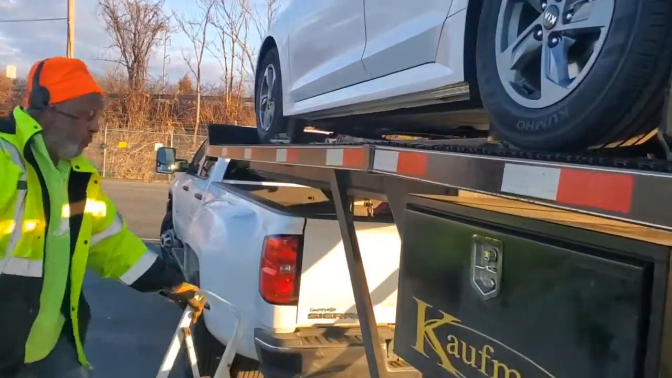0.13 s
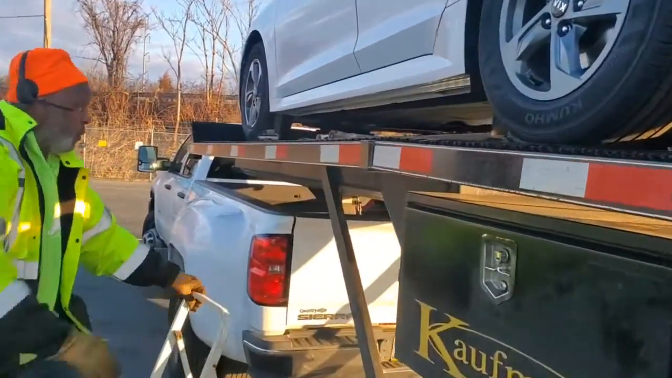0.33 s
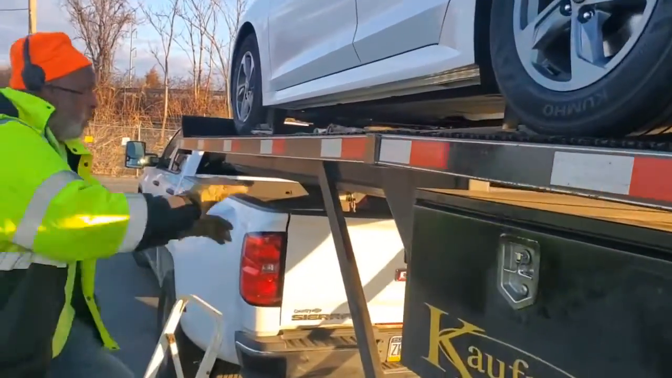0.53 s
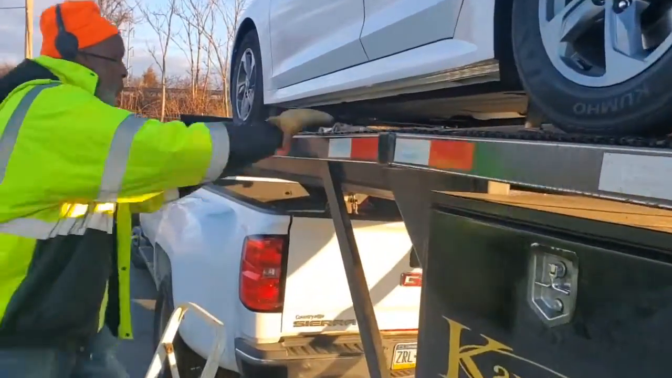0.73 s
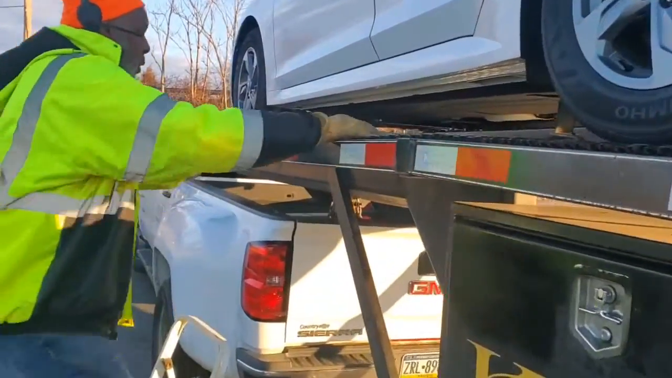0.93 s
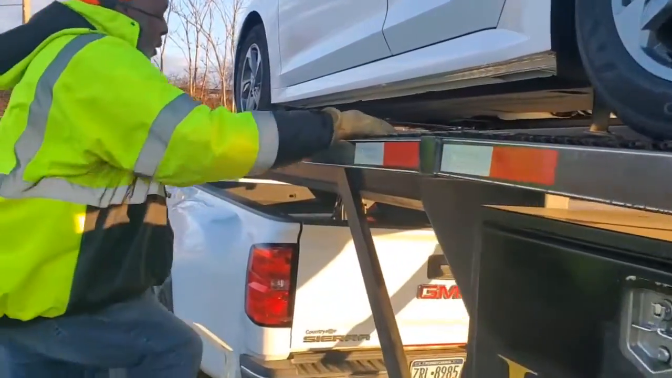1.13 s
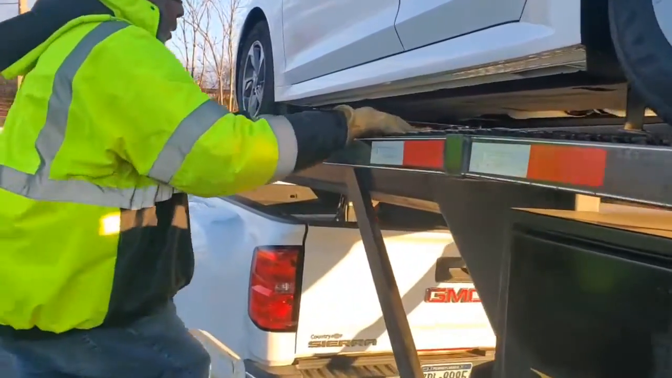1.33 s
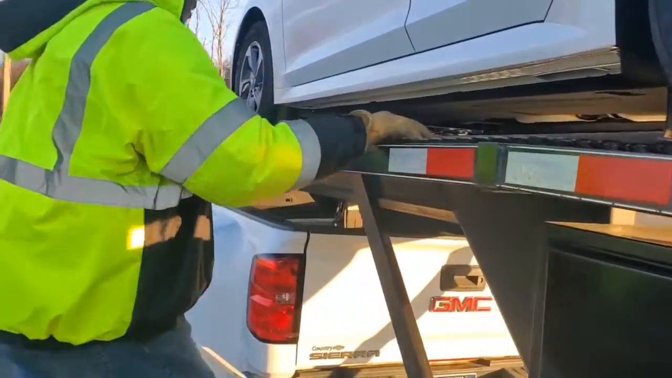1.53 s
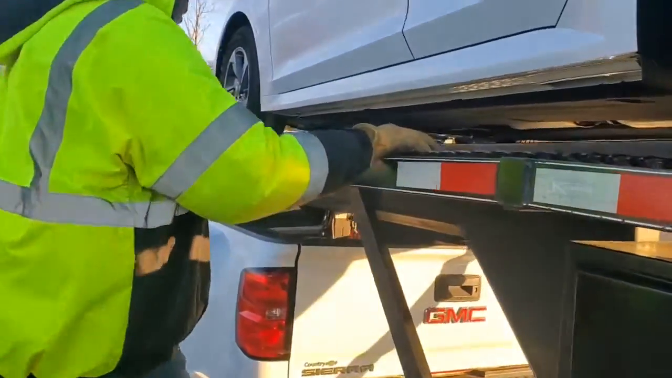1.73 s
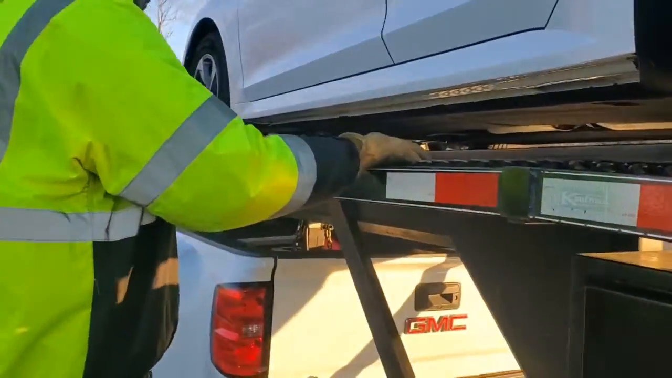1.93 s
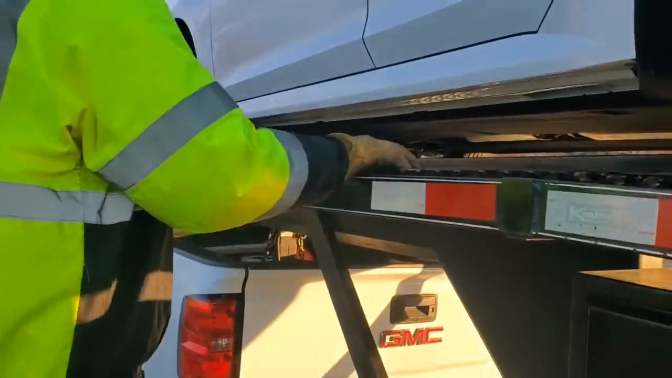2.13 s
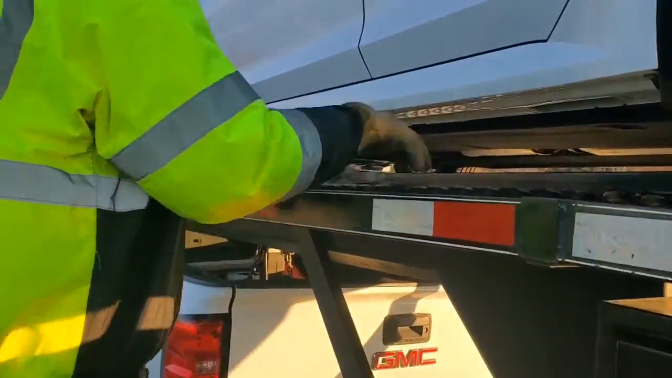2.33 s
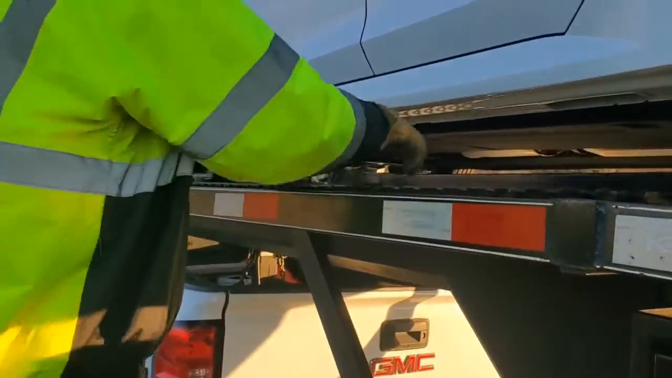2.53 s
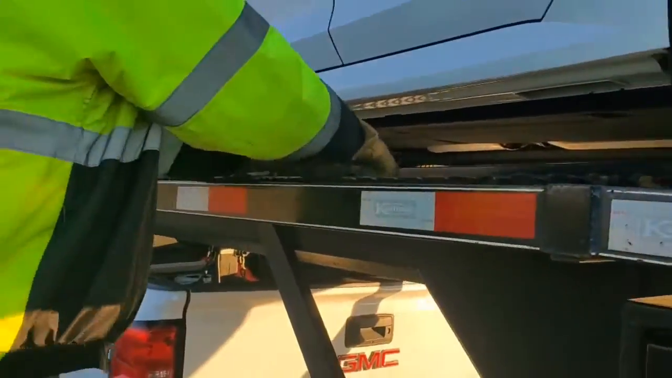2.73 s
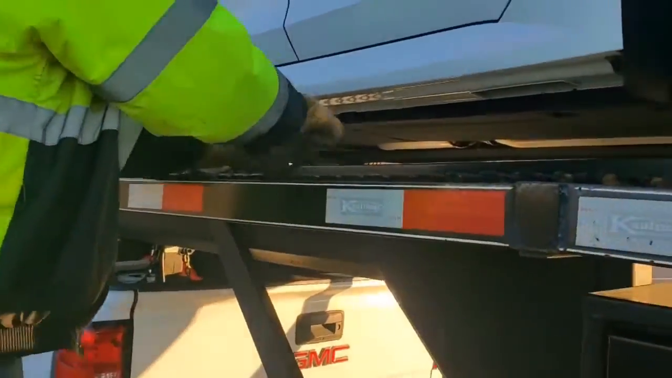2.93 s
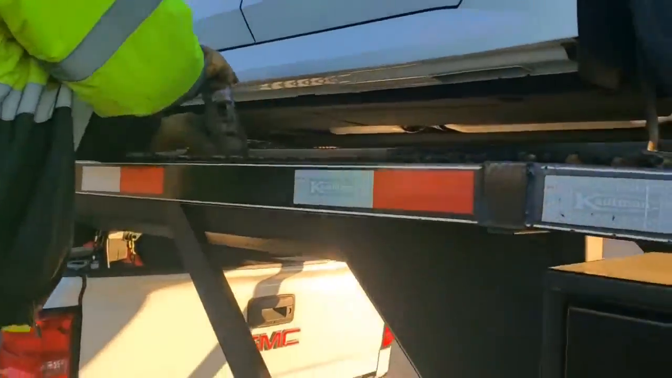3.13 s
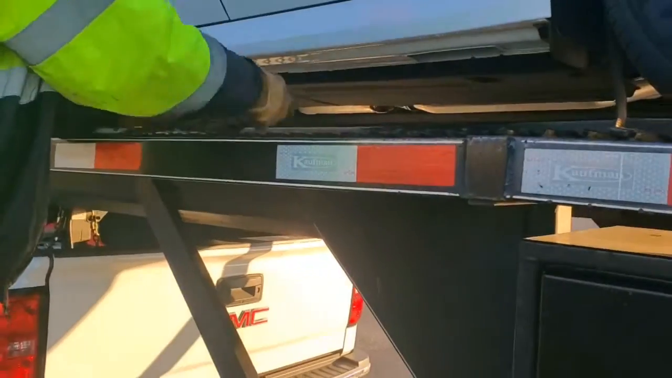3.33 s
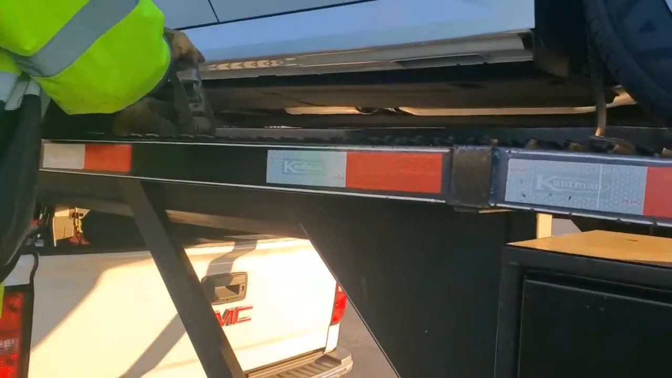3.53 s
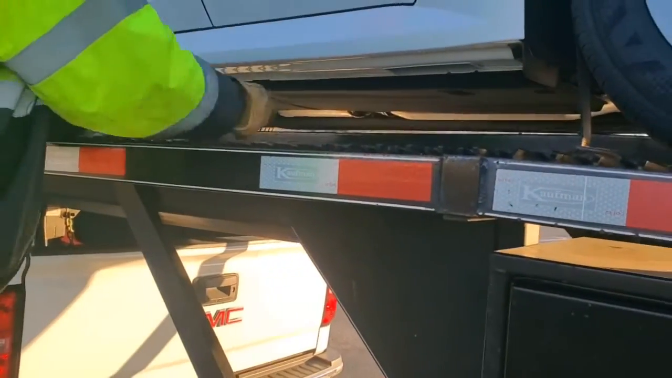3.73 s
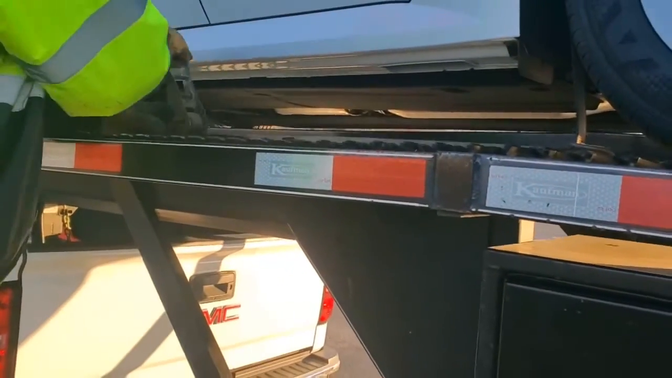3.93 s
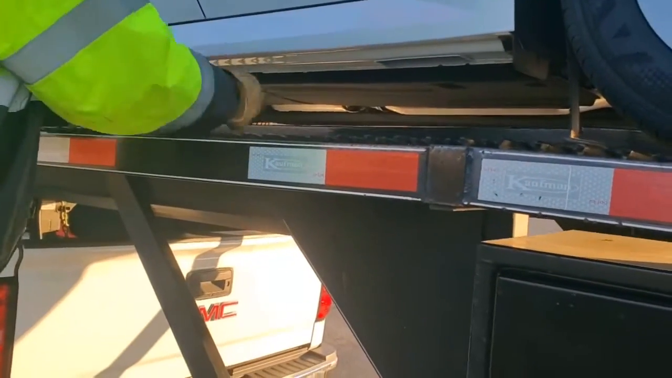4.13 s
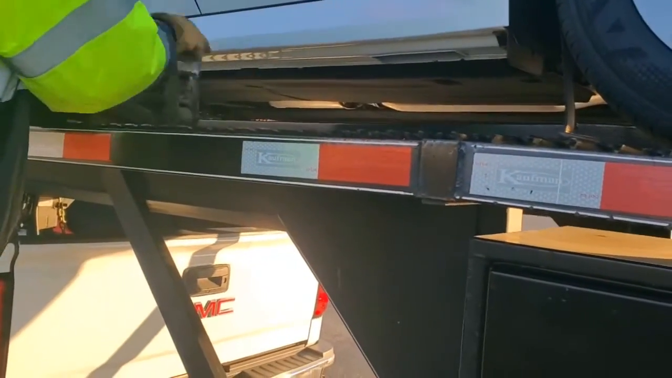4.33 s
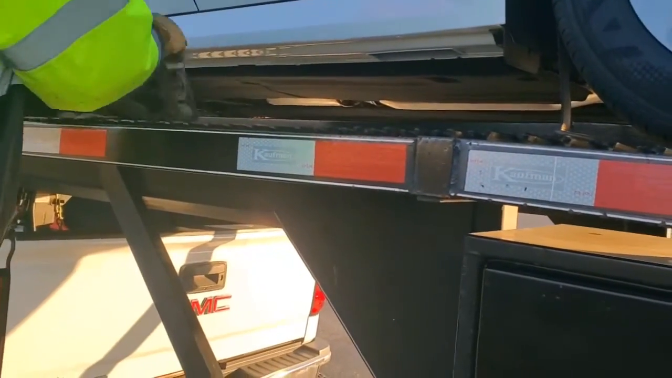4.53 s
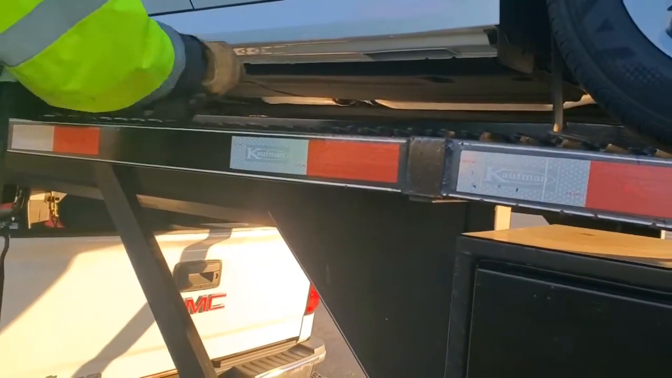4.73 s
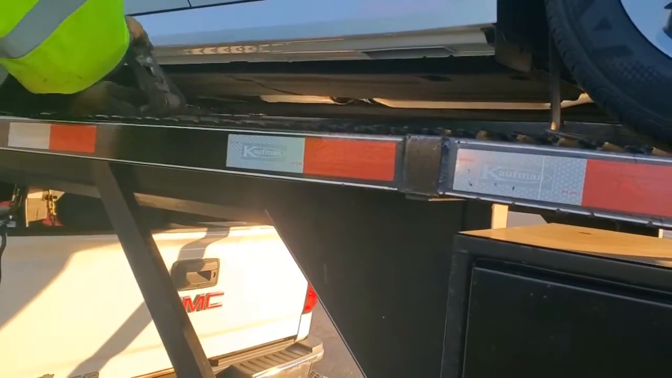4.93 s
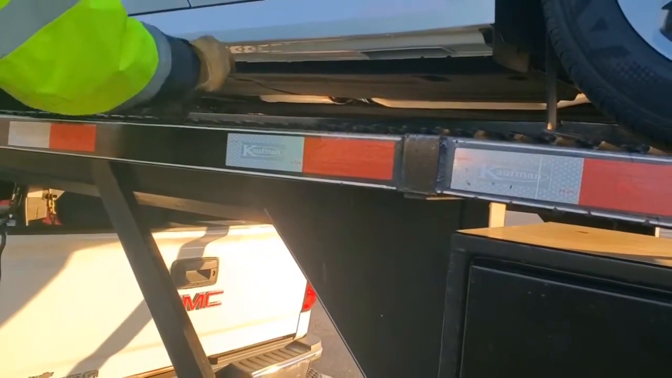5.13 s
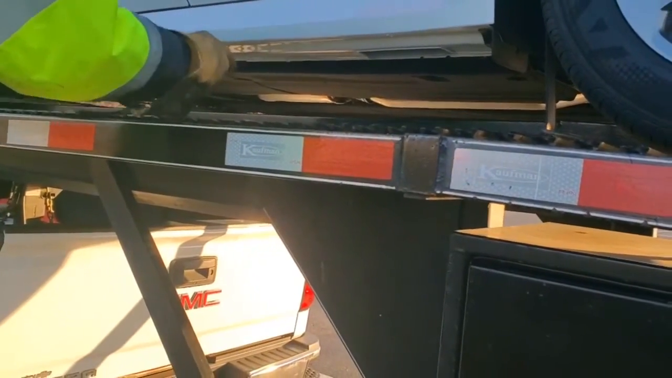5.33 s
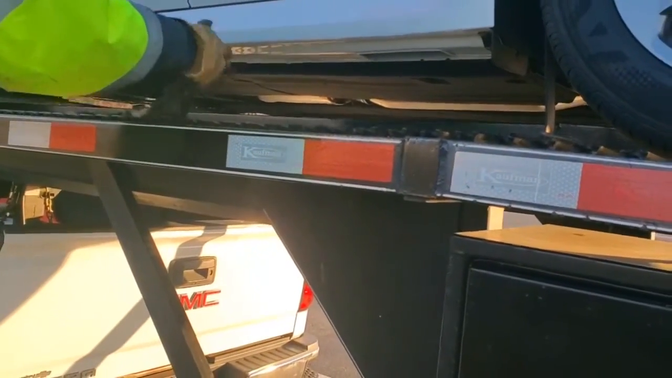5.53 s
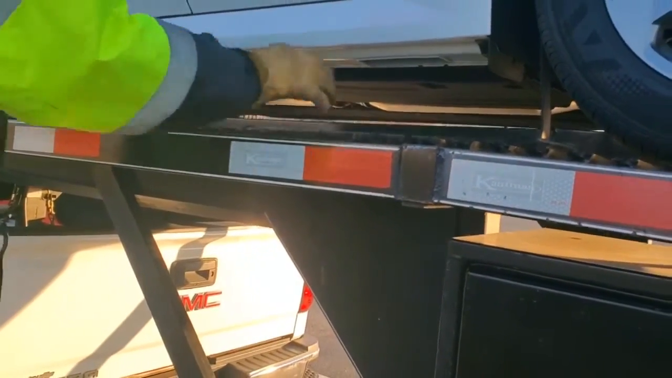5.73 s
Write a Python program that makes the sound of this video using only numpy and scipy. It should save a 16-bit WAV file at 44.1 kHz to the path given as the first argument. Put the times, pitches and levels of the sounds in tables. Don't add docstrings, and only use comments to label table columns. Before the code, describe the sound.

Outdoors in gusty wind, ladder feet grate briefly, a gloved hand fumbles on metal, and a ratchet handle clicks, bangs and rattles hard.

```python
import sys
import numpy as np
from scipy import signal
from scipy.fft import rfft, irfft, next_fast_len
from scipy.io import wavfile
from scipy.ndimage import uniform_filter1d, map_coordinates

SR = 44100
rng = np.random.default_rng(int(sys.argv[2]) if len(sys.argv) > 2 else 0)


def materialize(psi):
    bounded = np.clip(np.atleast_2d(psi).T, -1, 1)
    quanta = np.round(bounded * 32767).astype(np.int16)
    wavfile.write(sys.argv[1], SR, quanta)


def how_loud(loudness_db):
    steps = np.asarray(loudness_db, float) / 20
    return 10 ** steps


N = 254456

# (time [s], strength [dB])
BREEZE = [(0, -44), (.6, -41), (1.0, -39.5), (1.16, -43), (1.3, -41.5), (1.6, -34.5), (2.0, -34.5),
          (2.6, -37), (3.0, -34.5), (3.5, -34), (3.7, -42), (4.05, -34), (4.35, -38.5), (4.47, -42),
          (4.68, -34), (5.08, -39.5), (5.45, -36.5), (5.77, -39.5)]
# (time [s], peak [dB], left minus right [dB])
EDDIES = [(0.349, -31.5, 2), (0.489, -32, -2), (0.769, -32, -2), (1.033, -48, -11), (1.094, -29, -4),
          (1.458, -31, 3), (1.674, -23.5, 5), (1.791, -31.5, 17), (2.044, -21.5, 3), (2.243, -24.5, -1),
          (2.39, -30, 8), (2.466, -29.5, -6), (2.582, -33, 5), (2.706, -20, -2), (2.771, -27, 10),
          (2.977, -23, -2.5), (3.032, -24, 3), (3.214, -22, 2), (3.345, -21.5, 3), (3.48, -22, 0),
          (3.634, -28.5, -5), (3.78, -24.5, -1), (3.97, -22.5, -1), (4.362, -29.5, 3), (4.548, -23.5, 1),
          (4.6, -23, -2), (4.811, -30, 14), (5.014, -20, 3), (5.139, -32, -7), (5.343, -25, -6.5)]
# (time [s], peak [dB], half length [s])
RUSTLES = [(1.056, -63, 0.13), (.6, -68.5, 0.17), (1.45, -69.5, 0.42), (2.197, -59.5, 0.34),
           (2.8, -63, 0.22), (2.476, -56.5, 0.23), (3.09, -50, 0.084), (3.36, -58, .07), (3.8, -60, 0.33),
           (4.2, -62, 0.18), (4.62, -66, .12), (4.898, -49, 0.049), (5.705, -65.5, 0.37)]
# (frequency [Hz], density [dB/Hz])
BUFFET_SPECTRUM = [(12, -47), (20, -2), (32, -46), (50, -1.5), (75, -1), (99, -1), (129, -15), (162, -11.5),
                   (260, -28), (340, -27), (570, -120)]
# (frequency [Hz], density [dB/Hz])
RUSH_SPECTRUM = [(88, -9.5), (150, 5), (240, 0.5), (414, -4.5), (662, -7), (1060, -12.5), (3290, -26.5),
                 (6640, -32.5), (7770, -36), (15100, -36), (16000, -37)]

# (time [s], level [dB], brightness [dB])
DRAG = [
    (0.0, -14, -6),
    (.1, -21, -12),
    (.138, -16, -9.5),
    (.292, -23.5, -15.5),
    (.32, -22.5, -3),
    (.398, -51, -25),
    (.43, -33, -9.5),
    (.482, -33, -12),
    (.53, -63, -8),
]
# (time [s], frequency [Hz], level [dB], t60 [s])
PINGS = [(.006, 1684, -11.5, 0.1), (0.126, 1730, -17, 0.075), (.115, 4200, -13, 0.42),
         (.19, 1707, -18, 0.48), (.266, 2760, -19.5, 0.2), (.293, 1780, -24, .04),
         (0.427, 2160, -16.5, 0.068), (1.355, 1600, -46, 0.055), (.018, 1950, -19, .1),
         (.022, 1230, -17, .1), (.07, 2170, -25, .2), (.122, 2180, -13.5, .1), (.12, 2760, -16, .1),
         (.145, 2900, -18, .1), (.162, 1880, -19, .1), (.175, 840, -22, 0.073), (.225, 1740, -23, 0.4),
         (.22, 2820, -17, .2), (2.255, 3690, -40, 0.18), (2.901, 1436, -28, 0.12),
         (3.72, 1950, -12.5, 0.052), (4.13, 600, -33, 0.079)]
# (time [s], frequency [Hz], level [dB], t60 [s], glide [Hz/s])
SQUEAKS = [
    (.77, 2365, -47.5, 0.61, -700),
    (.865, 2230, -48.5, 0.62, 399),
    (0.92, 2780, -56, .8, 901),
    (.9, 2900, -52, 0.84, 900),
    (.99, 2950, -52, 0.43, 1200),
    (.995, 2330, -51, 1.1, -700),
    (1.215, 1760, -42, .1, 3000),
    (1.232, 2150, -36, .1, 2999),
    (1.236, 3250, -37, .08, 3000),
]
# (frequency [Hz], width [Hz], level [dB])
LADDER_MODES = [(750, 43, -17.5), (1675, 37, 7), (1950, 114, 7), (2350, 15, -2.5), (2400, 32, -31),
                (2760, 85, -4), (2900, 23, -46), (3140, 27, 3), (4380, 28, -0.5), (5840, 88, -14),
                (8480, 240, -7)]
# (frequency [Hz], density [dB/Hz])
LADDER_SPECTRUM = [(170, -14), (300, -12.5), (737, -1.5), (1390, -3.5), (1660, -7), (2070, -6), (2840, 4),
                   (7440, -4.5), (11500, -4), (16000, -17.5)]

# (time [s], peak [dB], brightness [dB/octave], t60 [s])
TOUCHES = [(.415, -30, 2.5, 0.35), (.535, -38, -0.5, 0.32), (1.224, -33, 0.5, 0.14), (1.242, -45, 7.5, 0.2),
           (1.355, -36.5, -2, 0.11), (1.426, -42.5, 5, 0.16), (1.698, -41, 0.5, 1), (2.015, -32, -2, 0.12),
           (2.075, -48, 5, 0.19), (2.181, -40, 0, 0.11), (2.256, -36.5, -1.5, 0.32), (2.492, -38, -8, 0.13),
           (2.655, -35, -2, 0.89), (2.7, -28, -2, 0.29), (2.735, -27, 2, 0.16), (2.753, -32, 2.5, 0.23),
           (2.829, -28.5, -1, 1), (2.898, -22, 0, 0.34), (3.479, -30.5, 3.5, 0.81), (3.584, -31, -1, 0.76),
           (4.365, -28, 0.5, 0.7), (4.759, -24.5, 2, 0.57), (5.299, -37.5, -8, 0.15),
           (5.584, -32, -2.5, 0.44), (5.623, -40.5, -4.5, 1)]
# (time [s], peak [dB], brightness [dB/octave], t60 [s], first knock [dB])
BANGS = [(3.036, -19.5, 2.5, 0.64, -3), (3.086, -17.5, 2, 0.28, 3), (3.197, -18, 1.5, 1, 7),
         (3.295, -17.5, 1.5, 1, 1), (3.343, -14, 0, 1, -8), (3.43, -11, 4, 0.35, 1),
         (3.635, -23.5, 0, 0.51, -1), (3.667, -25.5, 2.5, .99, -10), (3.716, -9, 1.5, 0.59, -7),
         (3.817, -12.5, 2.5, 0.51, 1), (4.002, -16, 1.5, 0.68, 1), (4.099, -13, 3, 0.51, -22),
         (4.196, -17, 1, 0.26, -4), (4.242, -19, 1.5, 0.51, 3), (4.479, -17, 2.5, 0.57, -29),
         (4.616, -22.5, 2, 1, -3), (4.655, -9.5, 2, 0.43, -17), (4.882, -24, 2, 0.56, 11),
         (5.001, -21, -1.5, 0.25, 12), (5.015, -11, 2.5, 0.38, -3), (5.101, -21, 2.5, 0.73, 10.5),
         (5.177, -27, 5.5, 0.33, 7)]
# (frequency [Hz], level [dB], t60 [s])
DECK_MODES = [(433.5, -2.5, 0.23), (453.6, -0.5, 0.33), (548.8, -1, 0.29), (653, 4, 0.068),
              (817, -2.5, 0.15), (833, -29, 0.3), (1004, -12, 0.11), (1123, -16, 0.34), (1300, -8, 0.11),
              (1360, 0.5, 0.042), (1720, -45, .15), (2024, -4, 0.13), (2325, -3, 0.14), (3540, -24, 0.33)]
# (frequency [Hz], level [dB], t60 [s])
HANDLE_MODES = [(2400, -5.5, 0.13), (2990, -4, 0.15), (4230, 7, 0.13), (5030, 0, 0.064), (6900, 8.5, 0.085),
                (8500, -5, .08), (11300, -0.5, .1), (13300, -1, .08)]
# (frequency [Hz], density [dB/Hz])
DECK_SPECTRUM = [(120, -44), (200, -7.5), (432, -5), (883, -4.5), (986, -0.5), (1180, -5), (2330, -7.5),
                 (8270, -19.5), (12200, -23), (16000, -28.5)]
# (time [s], peak [dB], ring [Hz], t60 [s])
KNOCKS = [(1.984, -42, 934, 0.053), (2.075, -33.5, 1480, 0.048), (2.18, -40, 1900, .05),
          (2.254, -39.5, 3580, .08), (2.49, -34, 1200, .025), (2.66, -38, 1860, .06),
          (2.752, -28.5, 1710, 0.054), (2.829, -34.5, 1080, .08), (2.901, -23, 1190, .08),
          (3.013, -36, 825, .06), (3.194, -19, 1080, .1), (3.215, -23, 990, 0.065),
          (3.299, -14.5, 1110, 0.11), (3.33, -15.5, 960, 0.14), (3.35, -21, 710, 0.083),
          (3.378, -22, 790, 0.11), (3.428, -14, 1020, 0.088), (3.452, -17.5, 780, 0.14),
          (3.474, -19, 690, 0.12), (3.721, -19, 1270, 0.064), (3.728, -13, 850, 0.12),
          (3.818, -23, 870, 0.15), (4.002, -18, 1090, 0.067), (4.008, -16, 1480, 0.066),
          (4.03, -24.5, 800, .12), (4.108, -21, 915, 0.14), (4.165, -21.5, 555, 0.12),
          (4.24, -28, 704, 0.091), (4.099, -25.5, 2420, 0.11), (4.135, -21.5, 640, 0.17),
          (4.481, -27, 1010, 0.072), (4.499, -18.5, 1060, 0.13), (4.665, -15.5, 1045, 0.16),
          (4.69, -27, 910, 0.081), (5.012, -16, 980, 0.086), (5.035, -27, 610, 0.12),
          (5.261, -31, 1000, 0.13), (5.424, -35.5, 900, 0.049), (5.584, -36, 1500, 0.03)]

# (time [s], peak [dB], loudest ring [Hz], share of broad crack [dB])
SNAPS = [(2.72, -42, 8460, 11.5), (2.873, -38, 6120, 6), (2.901, -31, 6900, 6), (3.04, -10, 13000, 5),
         (3.0719, -25, 7060, 0), (3.0859, -6, 11700, 3.5), (3.266, -12, 6900, 5.5),
         (3.319, -10.5, 12050, 0.5), (3.641, -31, 11800, 2), (3.6634, -21, 6500, 1),
         (3.711, -3.5, 14700, -8), (4.058, -23, 6400, 3), (4.1145, -12, 7080, 2.5), (4.2415, -34, 6800, 0),
         (4.361, -16, 11740, 6.5), (4.443, -28, 8900, 7), (4.488, -34, 11800, 7), (4.613, -2, 14340, -9.5),
         (4.6566, -13.5, 12500, 4), (4.875, -4, 11630, -5), (4.9296, -15, 12400, 3),
         (4.9364, -40, 11900, 5), (5.017, -33, 9100, -7), (5.1032, -9.5, 13300, 3), (5.181, -26, 10600, 4),
         (5.56, -41, 12100, 7.5)]
# (frequency [Hz], level [dB], t60 [s], not used: all ring 0.022 s)
PAWL_MODES = [(4320, -12, 0.29), (5920, -4, 0.064), (9040, -13, 0.052), (8400, -19, 0.76),
              (10200, -25, 0.066), (11360, -1.5, 0.019), (13700, 1, 0.18), (15550, 14, 0.063),
              (15490, -21, 0.053)]
# (frequency [Hz], density [dB/Hz])
CRACK_SPECTRUM = [(1500, -58), (3000, -4.5), (5000, -0.5), (9000, -3.5), (14000, -2.5), (17000, -14)]
# (frequency [Hz], common share [0..1])
LIKENESS = [(200, 0.98), (700, 0.82), (2000, 0.17), (6000, 0.17), (15000, 0.1)]

EDDY_HZ, EDDY_SPREAD, EDDY_S, EDDY_SKEW_TURNS = 72.2, 0.2, 0.0073, 0.044
SWAY_DB = 4
RUSH_DB, RUSH_FOLLOWS_DB_PER_DB = -47.5, 0.8
HISS_DB = -65
PING_RISE_PER_T60, PING_CUT_S = 0.015, .12
HAND_KNOCK_DB, CONTACT_MS = 6, 3.94
KNOCK_RISE_S, KNOCK_RING_S, KNOCK_TICK_DB = 0.00036, 0.011, -8
CHATTER_S, CHATTER_GROWTH_DB_PER_DB = 0.0055, 0.2
SNAP_ECHO_T60_S = 0.058
TOP_RING_DB, TOP_RING_T60_S = 4, 0.033
MODE_MIX_DB = 1.8
RIGHT_LAG_S = 0.000093

CENTRES_HZ = 250 * 2 ** np.arange(0, 6.1, .75)
SIZE = next_fast_len(N)
HZ = np.fft.rfftfreq(SIZE, 1 / SR) + 1e-3
TIME = np.arange(N) / SR
LEFT_RIGHT = np.array([[1], [-1]])


def unit(x):
    return x / np.sqrt(np.mean(x ** 2))


def on_hz(table, hz):
    table_hz, values = np.array(table).T
    return np.interp(np.log(hz), np.log(table_hz), values)


def curves(table):
    s, *columns = np.transpose(table)
    return [np.interp(TIME, s, c) for c in columns]


def walk(rate_hz):
    k = int(SR / rate_hz)
    held = np.repeat(rng.standard_normal(N // k + 1), k)
    return 1.23 * uniform_filter1d(uniform_filter1d(held, k), k)[:N]


def bands(spectrum, size=SIZE):
    hz = np.fft.rfftfreq(size, 1 / SR) + 1
    noise = rfft(rng.standard_normal((2, size))) * how_loud(on_hz(spectrum, hz))
    noise = noise.astype(np.complex64)
    count = len(CENTRES_HZ)
    place = np.interp(np.log(hz), np.log(CENTRES_HZ), np.arange(count))
    windows = [np.clip(1 - abs(place - k), 0, 1).astype(np.float32) for k in range(count)]
    parts = np.array([irfft(noise * window, size)[:, :N] for window in windows])
    return parts / np.std(parts.sum(axis=0))


def ring(x, modes):
    out = 0
    for k, (hz, db, t60_s) in enumerate(modes):
        r = np.exp(-np.log(1000) / (t60_s * SR))
        poles = [1, -2 * r * np.cos(2 * np.pi * hz / SR), r * r]
        out = out + (-1) ** k * how_loud(db) * signal.lfilter([1 - r, 0, r - 1], poles, x)
    return out


def ports(pair):
    a, b = rfft(pair, SIZE)
    like = np.clip(on_hz(LIKENESS, HZ), 0, 1)
    common, apart = np.sqrt((1 + like) / 2) * a, np.sqrt((1 - like) / 2) * b
    lag = np.exp(-2j * np.pi * HZ * RIGHT_LAG_S)
    return irfft([common + apart, (common - apart) * lag], SIZE)[:, :N]


def clacks(gain, spectrum, rate_hz, cycles, spread_db, count=70):
    size, out = gain.shape[1], 0
    modes_hz = 350 * 18 ** ((np.arange(count) + rng.random(count)) / count)
    weights = how_loud(on_hz(spectrum, modes_hz)) * np.sqrt(modes_hz)
    weights = weights / np.linalg.norm(weights)
    places = np.log2(modes_hz / CENTRES_HZ[0]) / .75
    for hz, weight, place in zip(modes_hz, weights, places):
        hits = int(rate_hz / count * size / SR * min(hz / 1500, 1.2))
        when, luck, turn = rng.random((400, 3))[:hits].T
        at = (when * size).astype(int)
        r = 1000 ** (-hz ** .5 / (cycles * SR))
        blows = how_loud(-spread_db * np.log(1 - .97 * luck))
        level = weight * np.sqrt(2 * (1 - r * r) * size / np.sum(blows ** 2))
        blows = blows * level * map_coordinates(gain, [place + 0 * at, at], order=1)
        kicks = np.full((2, size), 1e-12)
        kicks[:, at] = blows, blows * np.sign(turn - .5)
        angle = 2 * np.pi * hz / SR
        out = out + signal.lfilter([0, r * np.sin(angle)], [1, -2 * r * np.cos(angle), r * r], kicks)
    return out


def wind():
    power = how_loud(2 * curves(BREEZE)[0] + SWAY_DB * walk(4.84) * LEFT_RIGHT)
    buffet = rfft(rng.standard_normal((2, SIZE))) * how_loud(on_hz(BUFFET_SPECTRUM, HZ))
    mid, side = irfft(buffet, SIZE)[:, :N]
    eddies = unit(mid) * how_loud(4.0 * walk(22) - 1)
    eddies = eddies + .75 * unit(side) * how_loud(3.5 * walk(15) - 1) * LEFT_RIGHT
    thump, push = eddies * np.sqrt(power), power.mean(axis=0)
    for (s, db, pan_db), (pitch, skew, turn) in zip(EDDIES, rng.standard_normal((len(EDDIES), 3))):
        near = slice(int((s - .1) * SR), int((s + .1) * SR))
        t = TIME[near] - s
        swing = how_loud(db) * np.exp(-(t / EDDY_S) ** 2 / 2)
        turns = EDDY_HZ * (1 + EDDY_SPREAD * pitch) * t + turn + EDDY_SKEW_TURNS * skew * LEFT_RIGHT / 2
        thump[:, near] += swing * np.sin(2 * np.pi * turns) * how_loud(pan_db * LEFT_RIGHT / 2)
        push[near] += swing ** 2 / 2
    rush_db = RUSH_DB + RUSH_FOLLOWS_DB_PER_DB * (10 * np.log10(push) + 37)
    follow = np.clip(1.1 - 0.16 * np.arange(len(CENTRES_HZ)), 0, 1)
    rustle = sum(how_loud(2 * db) * np.exp(-2 * ((TIME - s) / half_s) ** 2) for s, db, half_s in RUSTLES)
    hiss_db = 10 * np.log10(how_loud(2 * HISS_DB) + rustle) + 68
    swell_db = np.array([k * (rush_db + 52.5) + (1 - k) * hiss_db + 2.13 * walk(14) for k in follow])
    mid, side = np.einsum("bcn,bn->cn", bands(RUSH_SPECTRUM), how_loud(swell_db)) * how_loud(-50.5)
    return thump + mid + 0.82 * side * LEFT_RIGHT


def ladder():
    level_db, bright_db = (c[:SR] for c in curves(DRAG))
    tilt_db = np.clip(np.log2(CENTRES_HZ / 2500), 0, 2)[:, None] / 2 * (bright_db + 7.0)
    gain = how_loud(tilt_db + level_db) * (TIME[:SR] < DRAG[-1][0]) + 1e-8
    grit = (bands(LADDER_SPECTRUM, size=SR) * gain[:, None]).sum(axis=0)
    grit = how_loud(-2.5) * grit * how_loud(2.75 * walk(220.4)[:SR])
    tubes = ring(grit, [(hz, db, 2.2 / width_hz) for hz, width_hz, db in LADDER_MODES])
    out = np.zeros((2, N))
    out[:, :SR] = grit + how_loud(4.5) * tubes + how_loud(-5.0) * clacks(gain, LADDER_SPECTRUM, 3500., 2.4, 3.4)
    t = TIME[:SR // 2]
    for s, hz, db, t60_s, glide_hz_per_s in [(*row, 0) for row in PINGS] + SQUEAKS:
        unsteady = 0.51 + uniform_filter1d(rng.standard_normal(len(t)), size=700) * 22
        tone = np.exp(2j * np.pi * (hz + glide_hz_per_s * t / 2) * t) * unsteady
        envelope = (1 - np.exp(-t / (PING_RISE_PER_T60 * t60_s))) * 1000 ** (-t / t60_s)
        envelope = how_loud(db) * envelope * np.clip((PING_CUT_S - t) * 40, 0, 1)
        i = int(s * SR)
        out[:, i:i + len(t)] += envelope * [tone.imag, 0.037 * tone.real]
    return ports(out) * how_loud(LEFT_RIGHT - 1.5)


def deck():
    step = 16
    power = np.zeros((len(CENTRES_HZ), (N + SR) // step))
    t = np.arange(SR // 3 // step) * step / SR
    octaves = np.log2(CENTRES_HZ / 1200)[:, None]
    for s, db, bright_db, t60_s, knock_db in BANGS + [(*row, HAND_KNOCK_DB) for row in TOUCHES]:
        i = int((s - .003) * SR / step)
        fade = np.exp(-2 * np.log(1000) * t / (max(t60_s, .02) * how_loud(-1.8 * octaves)))
        blow = (1 - np.exp(-t * 1000 / CONTACT_MS)) ** 2 * how_loud(2 * knock_db * np.exp(-t / 0.0094))
        power[:, i:i + len(t)] += how_loud(db - 7.5 + bright_db * octaves) ** 2 * fade * blow
    gain = np.repeat(np.sqrt(power + 1e-16), step, axis=1)[:, :N]
    flicker = how_loud([2.06 * walk(45) for _ in CENTRES_HZ])
    scrape = np.einsum("bcn,bn->cn", bands(DECK_SPECTRUM), gain * flicker)
    scrape = how_loud(-3.5) * scrape * how_loud(1.68 * walk(140))
    handle = ring(scrape[0], HANDLE_MODES) * np.array([[1], [.4]])
    rattle = scrape + how_loud(-4.5) * clacks(gain, DECK_SPECTRUM, 2800., 2.3, 3.1) + how_loud(2.0) * handle
    plates = ring(rattle[0], DECK_MODES) * np.array([[1], [.3]])
    return ports(rattle + how_loud(5.5) * plates) * how_loud(.8 * LEFT_RIGHT)


def knocks():
    out, t = np.zeros(N + SR), TIME[:6000]
    for (s, db, hz, t60_s), noise in zip(KNOCKS, rng.standard_normal((len(KNOCKS), len(t)))):
        shake = noise * 1000 ** (-t / max(t60_s, .01)) * (1 - np.exp(-t / KNOCK_RISE_S))
        body = ring(shake, [(hz, 0, KNOCK_RING_S), (hz * 1.35, -4, KNOCK_RING_S),
                            (hz * 0.736, -5, KNOCK_RING_S), (hz * 2.29, -13, .005)])
        tick = signal.lfilter([.4], [1, -.6], noise * np.exp(-t / .003))
        i = int(s * SR)
        out[i:i + len(t)] += how_loud(db) * (body / abs(body).max() + how_loud(KNOCK_TICK_DB) * tick)
    return ports(out[:N] * np.array([[1], [.4]])) * how_loud(.8 * LEFT_RIGHT)


def pawl():
    out, t = np.zeros((2, N + SR)), np.arange(8192) / SR
    crack_gain = how_loud(on_hz(CRACK_SPECTRUM, np.fft.rfftfreq(len(t), 1 / SR) + 1))
    for s, db, top_hz, crack_db in SNAPS:
        chatter_s = CHATTER_S * how_loud(CHATTER_GROWTH_DB_PER_DB * (db + 11.0))
        mix, bend = rng.standard_normal((2, len(PAWL_MODES)))
        noise = rng.standard_normal((2, 2, len(t)))
        shake = noise[0] * np.exp(-(t / max(chatter_s, 5e-4)) ** 2) * (1 - np.exp(-t / 0.0001)) + 1e-9
        modes = [(hz * (1 + 0.021 * b), min(mode_db, -5) + MODE_MIX_DB * m, .022)
                 for (hz, mode_db, _), m, b in zip(PAWL_MODES, mix, bend)]
        top = how_loud(TOP_RING_DB) * np.sin(2 * np.pi * top_hz * t)
        top = top * 1000 ** (-t / TOP_RING_T60_S) * (1 - np.exp(-t / 0.00085))
        top = top * how_loud(2.3 * uniform_filter1d(noise[0, 1], size=90) * 14.5)
        blur = how_loud(1) * noise[1] * 1000 ** (-t / SNAP_ECHO_T60_S) * (1 - np.exp(-t / 0.001))
        crack = irfft(rfft(shake + blur) * crack_gain, len(t)) * (t < .17)
        steel = (how_loud(14.5) * ring(shake[0], modes) + top) * np.array([[1], [.15]])
        i = int(s * SR)
        out[:, i:i + len(t)] += how_loud(db - 8.5) * (how_loud(crack_db) * crack + steel)
    return ports(out[:, :N]) * how_loud(1.5 * LEFT_RIGHT)


def scene():
    return wind() + ladder() + deck() + knocks() + pawl()


def band_limit(x):
    return signal.sosfilt(signal.butter(12, 16670, fs=SR, output="sos"), x)


def record(dry):
    top = how_loud(on_hz([(15750, 0), (15950, -30), (16600, -34), (16700, -80)], HZ))
    mix = np.clip(irfft(rfft(dry, SIZE) * top, SIZE)[:, :N], -1, 1)
    return band_limit(mix)


dry = scene()
out = record(dry)
materialize(out)
```